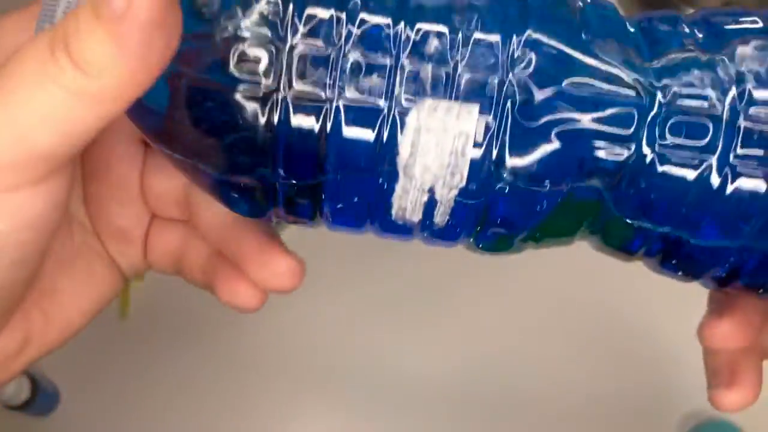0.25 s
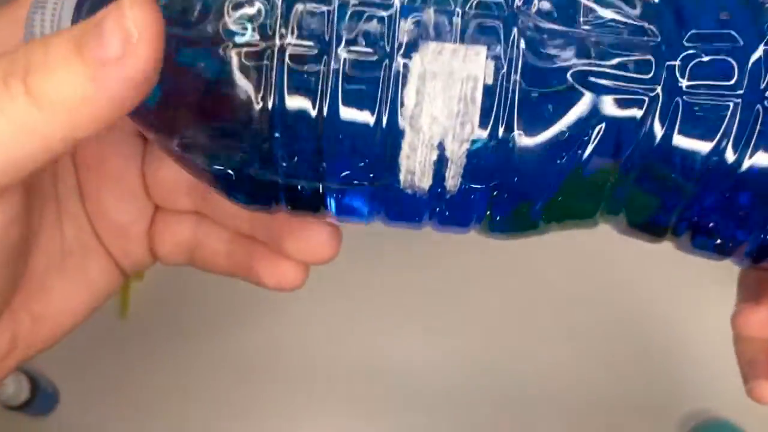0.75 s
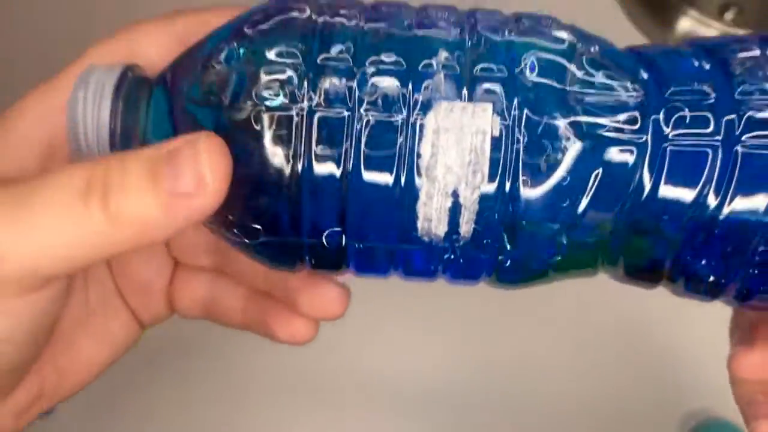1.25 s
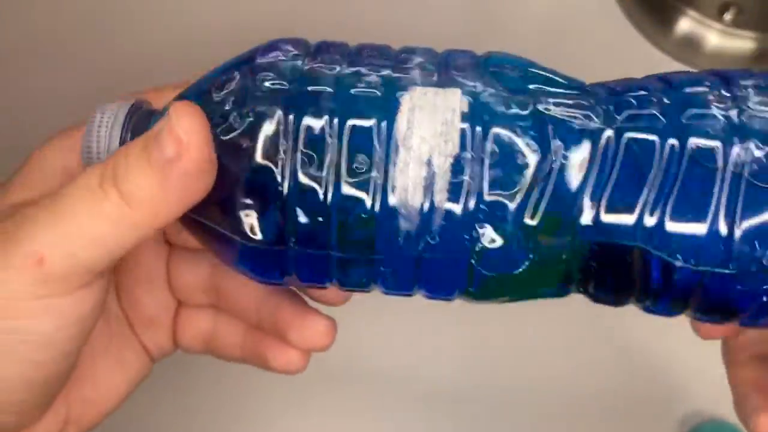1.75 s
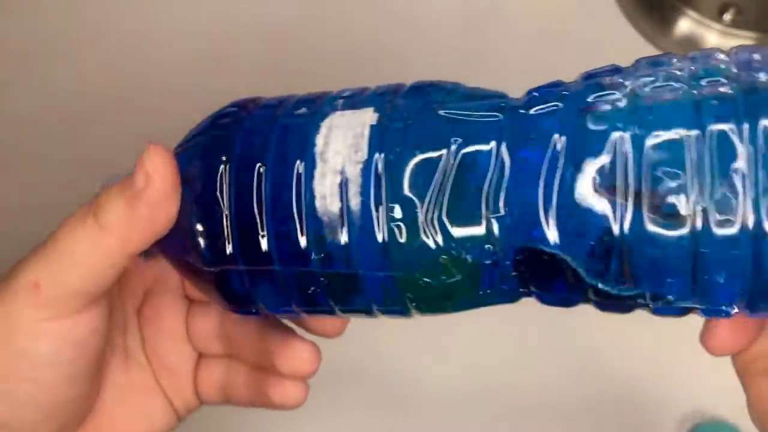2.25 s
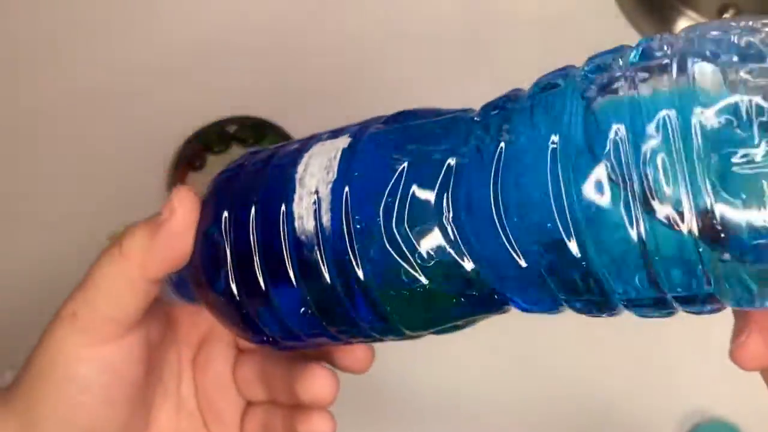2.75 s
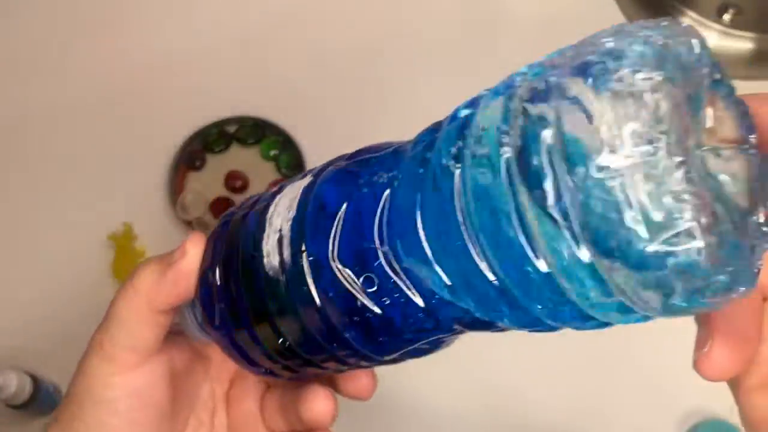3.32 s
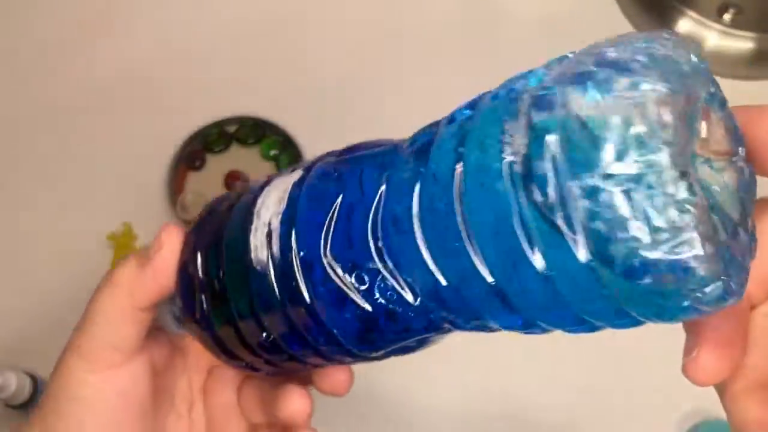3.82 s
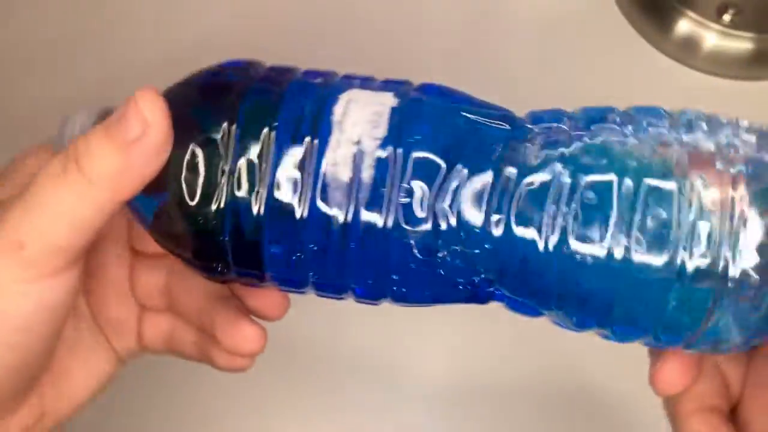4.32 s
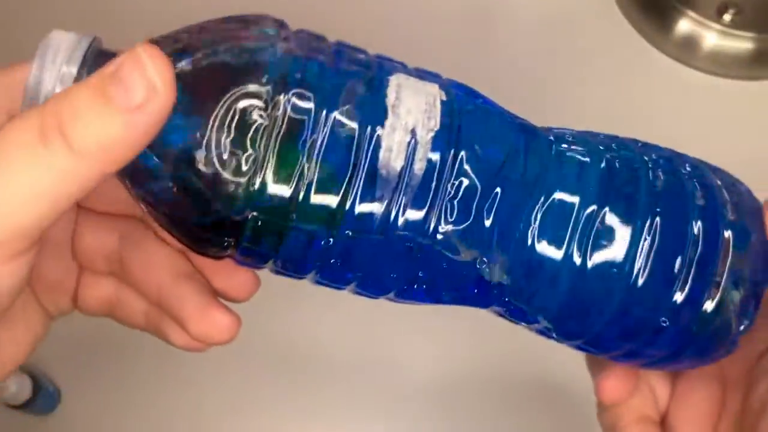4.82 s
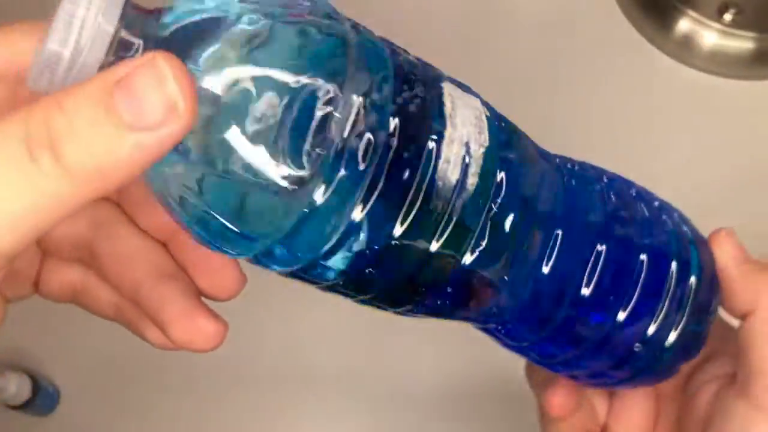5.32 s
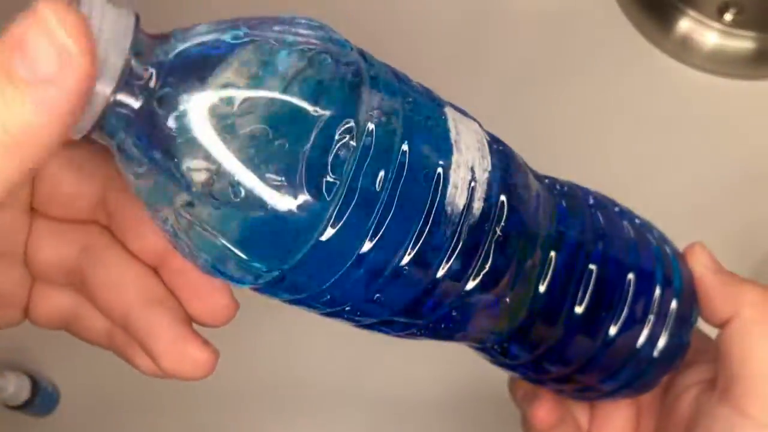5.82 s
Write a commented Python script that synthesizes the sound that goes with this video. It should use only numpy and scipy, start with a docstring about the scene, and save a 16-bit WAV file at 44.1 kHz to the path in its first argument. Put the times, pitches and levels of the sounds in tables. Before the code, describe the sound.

A thin plastic bottle of liquid and pebbles is tipped close to the microphone in a small, fairly dry room, with a steady low electric hum and soft air beneath. From 0 to 0.4 s the stones settle with soft thuds and light knocks, then almost nothing until 1.1 s. A slow, muffled slide with scattered clicks runs from 1.2 to 2.05 s, with a faint skin-on-plastic hiss near 1.7 and a sharp knock at 1.95. After a lull, stones run from 2.6 s, growing brighter and denser into a crisp rattling pile-up around 3.0-3.4, ending by 3.5. Hum remains until 4.25. Then jerky clacks and wet, hollow rumbling build from 4.3, becoming a continuous scraping cascade after 4.9, loudest and most clattery at 5.4-5.75, with bubbly blips. It drops away quickly after 5.85, leaving hum.

```python
"""Pebbles tumbling in a bottle

A thin plastic bottle of water, oil and pebbles is tipped back and forth by hand, close to the microphone.
Pebbles slide and tumble along the ribbed wall: random touches ring the wall, the ribs and the stones.
Single strikes are short noise bursts in four bands; short pitched rings and small bubbles are dying tones.
An appliance hums steadily in the small room, over a low rush of air."""
import sys
import numpy as np
from scipy import signal
from scipy.fft import rfft, irfft, next_fast_len
from scipy.io import wavfile
from scipy.ndimage import uniform_filter1d

SR = 44100
rng = np.random.default_rng(int(sys.argv[2]) if len(sys.argv) > 2 else 0)


def generate_wav(sig):
    """Save sig (samples, or channels by samples) to the path in sys.argv[1] as 16-bit PCM at SR."""
    pcm = np.round(np.clip(np.atleast_2d(sig).T, -1, 1) * 32767).astype(np.int16)
    wavfile.write(sys.argv[1], SR, pcm)


N = 267466
TIME = np.arange(N) / SR  # seconds

# single pebble strikes: start_s, level_db (before the part levels), hardness_db (higher: more tick, less knock),
# thud_db (extra level of the thud)
PEBBLE_STRIKES = [(0.006, -52, -16.5, 12.5), (0.037, -65, -12, 22.5), (0.0787, -60.5, -22, 4),
                  (0.1507, -64, -13, 0), (0.193, -44, -0.5, -3), (0.2152, -51.5, -7, -11),
                  (0.238, -49.5, -16, 1), (1.2897, -54.5, -10, 8), (1.3976, -44, -7, -14),
                  (1.4461, -47, -12, 1), (1.5213, -41.5, -3.5, -2.5), (1.569, -45.5, -3.5, -18),
                  (1.613, -40, -5.5, -2), (1.6591, -46.5, -12, 7), (1.797, -44.5, -7, -9),
                  (1.9014, -42, -3, -21), (1.9436, -49, 7, -17), (1.9524, -31, -8, -12),
                  (1.973, -38, -6, -3), (2.0271, -48.5, -8, -1), (2.665, -45.5, -11, 5),
                  (2.7488, -48, 3, -9.5), (2.8088, -44.5, -7, -2), (2.8477, -42, -3, -4),
                  (2.935, -42.5, -9.5, -9), (2.9963, -36, 7, 4.5), (3.0704, -37.5, 5, -9),
                  (3.089, -42, 2, 0.5), (3.1322, -34, 6, -19), (3.146, -40, 3, -5),
                  (3.239, -51.5, 13.5, 18), (3.2513, -48, 6, -5), (3.2663, -38.5, 17.5, -1),
                  (3.274, -37, 0, -2), (3.296, -42, 9, -20), (3.353, -41.5, 13.5, -17),
                  (3.39, -46.5, 14.5, 1), (3.449, -54.5, 7, -10), (3.483, -50.5, 1, 6),
                  (3.5057, -51.5, 7, 1), (4.2853, -47, -2.5, -8), (4.33, -49, -1, -5),
                  (4.386, -43.5, -4, -4.5), (4.4017, -46.5, 0, 7.5), (4.444, -52.5, -24, 8),
                  (4.4585, -37.5, -0.5, 3.5), (4.4792, -52.5, 20, 9), (4.516, -55, -2, -16),
                  (4.5241, -39.5, -17.5, 11.5), (4.551, -45, -8, 11), (4.5967, -33, -5.5, -8),
                  (4.653, -43.5, -10, -12), (4.734, -42.5, -13.5, 4), (4.7495, -49.5, 6, -15),
                  (4.7656, -36.5, 9.5, -7), (4.77, -35, -5, -2), (4.7979, -42.5, -7, -11),
                  (4.856, -48, -12, -14), (4.9957, -38, 2, 1), (5.0449, -35, -1.5, 0),
                  (5.0952, -40.5, -6, -7), (5.13, -38.5, 0.5, 5), (5.1818, -33, 4, 3),
                  (5.236, -39.5, 4, -3), (5.301, -40.5, -14, 1), (5.317, -40, 6, -9), (5.3729, -40, 2, -3),
                  (5.4052, -29.5, 8, 0.5), (5.4335, -37.5, 2, 6.5), (5.4874, -36, 10, 4),
                  (5.5238, -37.5, 8, -14), (5.5316, -32.5, 11.5, -22), (5.6024, -31, 3.5, -11),
                  (5.6217, -31, 2, -13.5), (5.63, -31.5, 8.5, -15), (5.6538, -35.5, 5, -8),
                  (5.6835, -34, 2.5, -20), (5.7286, -35.5, 4, -17), (5.762, -42, 5, -8),
                  (5.8236, -39, 4.5, -5)]
# frequency bands of thud, knock, crack and tick: low_hz, high_hz
PART_BANDS = [(250, 900), (900, 2400), (2400, 6000), (6000, 15000)]
# thud, knock, crack and tick of every strike: ring_t60_s, level_db (relative to the strike),
# follows (dB of gain per dB of hardness)
PART_SETTINGS = [(0.037, -3.7, 0), (0.033, -4.5, -0.83), (0.014, 1.77, 0.1152), (0.015, -1.5, 0.76)]
# modes of the water-loaded wall: pitch_hz, width_hz, level_db (relative)
WALL_MODES = [(167.4, 38, 1.5), (226.5, 31, -4), (315, 29, 0), (393.6, 31, 2.5), (491.6, 60, -1),
              (670, 56, 2.5)]
# colour of stones sliding over the ribs: pitch_hz, level_db (relative)
SLIDE_COLOUR = [(800, 2), (1020, 5.5), (1350, 2.5), (1750, 0.5), (2150, -1.5), (2700, 1), (3500, 2),
                (4500, 1)]
# colour of stones rattling on each other: pitch_hz, level_db (relative)
RATTLE_COLOUR = [(4500, 2.5), (5500, 2.5), (7200, 4.5), (8400, 6.5), (10000, 0), (13000, -4), (15500, -19)]
# colour of the room air: pitch_hz, level_db (relative, per Hz)
AIR_COLOUR = [(18, -55), (26, -26), (35, -10), (48, -1.5), (70, -3), (105, 0.5), (150, -8), (215, -12.5),
              (320, -12.5), (430, -19.5), (650, -23.5), (1100, -29.5), (2000, -33.5), (6000, -34.5),
              (16000, -39.5)]
# the loudest short pitched rings, from the bottle wall or air bubbles:
# start_s, pitch_hz, peak_db (before the soft start and decay)
SHORT_RINGS = [(.006, 410, -42), (.238, 698, -36), (1.702, 1400, -37), (1.708, 496, -32), (1.993, 159, -34),
               (3.026, 3130, -34), (3.15, 454, -29), (3.15, 178, -27.5), (3.258, 686, -26),
               (3.481, 463, -36), (3.93, 583, -51.5), (4.677, 1650, -31), (4.764, 1815, -26.5),
               (5.179, 1310, -23.5), (5.372, 465, -23.5), (5.588, 335, -25), (5.612, 658, -27.5),
               (5.735, 298, -27.5), (5.762, 2460, -35.5)]
# where the heap lies along the bottle decides which modes it drives most: time_s, rumble_hz, slide_hz
HEAP_FOCUS = [(0, 410, 2520), (1.7, 442, 2160), (2.7, 397, 2660), (3.05, 466, 2900), (3.17, 527, 1170),
              (3.5, 477, 1190), (4.45, 300, 1590), (4.95, 464, 1710), (5.22, 490, 1410), (5.45, 350, 2420),
              (5.7, 305, 2970)]
# the heap settles, slides slowly at the first tip, collapses a little, runs into the neck as the base is lifted,
# loosens in jerks when levelled, then runs down to the base as the neck is lifted:
# load_db (how heavily the heap bears on the wall), curve of (time_s, flow_db) for how fast it slides
BOTTLE_TILTS = [ (0, [(0, -46.5), (0.06, -57.5), (0.16, -57.5), (0.235, -56.5), (0.265, -46), (0.305, -69),
                (0.345, -53), (0.45, -73)]), (-1.5, [(1.12, -74), (1.22, -57.5), (1.31, -63.5),
                (1.4, -48.5), (1.56, -52.5), (1.7, -45), (1.81, -49.5), (1.86, -69)]), (1.5, [(1.93, -50.5),
                (1.98, -50), (2.06, -66), (2.2, -76.5)]), (3.5, [(2.46, -75.5), (2.61, -61.5),
                (2.68, -46.5), (2.9, -44), (3.16, -42), (3.37, -47.5), (3.43, -63.5), (3.48, -51),
                (3.55, -82)]), (0.1, [(4.24, -74), (4.3, -52), (4.43, -58.5), (4.47, -42.5), (4.56, -49),
                (4.635, -52), (4.68, -43), (4.79, -45.5), (4.84, -55)]), (1.14, [(4.89, -44), (5.12, -40.5),
                (5.3, -40), (5.42, -42.5), (5.65, -40), (5.82, -45), (5.9, -62), (6.06, -71.5)]), ]
# the heap piles up at an end of the bottle: middle_s, half_length_s, extra_rattle_db, extra_rumble_db
HEAP_LANDINGS = [(3.27, 0.15, 11.5, 2.5), (5.52, 0.33, 7.5, 3)]

AIR_DB, HUM_HZ, HUM_DB = -56, 120.4, -53.5
ROOM_T60_S, ROOM_DB = 0.29, -19.5
CUTOFF_HZ = 15800
# basic levels at full flow; below it, rumble and rattle fall by so many dB per dB of flow
FULL_FLOW_DB, FULL_RUMBLE_DB, FULL_RATTLE_DB = -39, -41.5, -51.5
RUMBLE_FOLLOWS, RATTLE_FOLLOWS = 0.96, 0.99
# the water keeps the wall stirring after the stones have stopped
WAKE_DB, WAKE_FADE_DB_PER_S = -8, 64
# lower rings last longer: t60 at 1 kHz, and its power law in pitch
RING_T60_S, RING_T60_POWER = 0.053, -0.33
# small bubbles: their peak relative to the flow, its scatter either way, and their range of pitch
BUBBLE_OVER_FLOW_DB, BUBBLE_SPREAD_DB = 4, 0.5
BUBBLE_LOW_HZ, BUBBLE_HIGH_HZ = 270, 1390
# a strike jostles its neighbours, which rattle on; the last value is dB of rattle per dB of hardness
JOSTLE_DB, JOSTLE_T60_S, JOSTLE_FOLLOWS = -5.5, 0.1, 0.51
# lesser hard clicks as stones drop onto the pile
PILE_CLICK_DB, PILE_SPREAD_DB, PILE_HARDNESS_DB, PILE_THUD_DB = -42.5, 1, 3.5, 0.5


def from_db(db):
    """Turn decibels into a gain."""
    return 10 ** (np.asarray(db) / 20)


def rms_one(x):
    """Scale a sound to an average (rms) level of 1."""
    return x / np.sqrt(np.mean(x ** 2) + 1e-20)


def at_hz(points, hz):
    """Read a colour table at any pitch, on a log-frequency axis."""
    pitch_hz, level_db = np.transpose(points)
    return np.interp(np.log(np.maximum(hz, 1)), np.log(pitch_hz), level_db)


def in_time(rows):
    """Turn each column of a curve table into one value per sample."""
    time_s, *columns = np.transpose(rows)
    return [np.interp(TIME, time_s, column) for column in columns]


def band(x, low_hz, high_hz):
    """Keep only the sound between two frequencies."""
    return signal.sosfilt(signal.butter(3, [low_hz, high_hz], "band", fs=SR, output="sos"), x)


def resonance(x, hz, width_hz):
    """Ring at one pitch, with gain 1 at the top; a narrow width rings longer."""
    r = np.exp(-np.pi * width_hz / SR)
    zeros = np.array([1, 0, -1]) * (1 - r * r) / 2
    poles = [1, -2 * r * np.cos(2 * np.pi * hz / SR), r * r]
    return signal.lfilter(zeros, poles, x + 1e-18)


def evened(x, span_s):
    """Hold the short-time rms near 1, keeping the grain inside the span."""
    size = max(int(span_s * SR), 64)
    power = uniform_filter1d(uniform_filter1d(x ** 2, size), size)
    floor = np.mean(x ** 2) / 1000  # keeps silence from being blown up
    return x / np.sqrt(np.maximum(power, 0) + floor)


def background():
    """A steady appliance hum (one sine) over the low rush of room air (coloured noise)."""
    size = next_fast_len(N)
    white = rfft(rng.standard_normal(size))
    hz = np.arange(len(white)) * SR / size
    air = irfft(white * from_db(at_hz(AIR_COLOUR, hz)), size)[:N]
    hum = np.sqrt(2) * np.sin(2 * np.pi * HUM_HZ * TIME)
    return from_db(AIR_DB) * rms_one(air) + from_db(HUM_DB) * hum


def contacts(per_s, spread_db):
    """Random touches, most of them light and a few heavy."""
    sizes = from_db(spread_db * np.minimum(rng.exponential(1, N), 4))
    happens = rng.random(N) < per_s / SR
    return sizes * rng.choice([-1, 1], N) * happens


def favoured(hz, centre_hz, lift, octaves):
    """Gain over time of a mode: it grows as the driven region comes near its pitch."""
    return 1 + lift / (1 + (np.log2(hz / centre_hz) / octaves) ** 2)


def stone_rings(touches, colour, cycles, uneven_db, count, drive=lambda hz: 1):
    """Each touch favours a few modes of the bank, so every grain has a pitch of its own."""
    at, out = np.flatnonzero(touches), np.zeros(N)
    for hz in np.geomspace(colour[0][0], colour[-1][0], count):
        draw = rng.standard_normal((len(at), 2))
        uneven = from_db(uneven_db * np.clip(draw[:, 1], -2, 2))
        force = np.zeros(N)
        force[at] = touches[at] * np.sign(draw[:, 0]) * uneven
        ring = rms_one(resonance(force, hz, hz / cycles))
        out += from_db(at_hz(colour, hz)) * drive(hz) * ring
    return out


def jostled():
    """The rattle that the strikes set off, as a gain over time; each strike adds power that dies away."""
    start_s, level_db, hardness_db, _ = np.transpose(PEBBLE_STRIKES)
    kicks = np.zeros(N)
    kicks[(start_s * SR).astype(int)] = from_db(level_db + JOSTLE_DB + JOSTLE_FOLLOWS * hardness_db) ** 2
    keep = from_db(-60 / (JOSTLE_T60_S * SR)) ** 2
    return np.sqrt(signal.lfilter([1], [1, -keep], kicks + 1e-18))


def heap_motion():
    """Levels (dB) of rumble, sliding and rattle: all follow the flow; landings boom and rattle more."""
    curves = [(s, flow_db, load_db) for load_db, curve in BOTTLE_TILTS for s, flow_db in curve]
    flow_db, load_db = in_time(curves)
    below_full_db = flow_db - FULL_FLOW_DB
    rumble_db = FULL_RUMBLE_DB + load_db + RUMBLE_FOLLOWS * below_full_db
    rattle_db = FULL_RATTLE_DB + RATTLE_FOLLOWS * below_full_db
    # the wake falls steadily from the strongest rumble so far
    fade_db = WAKE_FADE_DB_PER_S * TIME
    wake_db = np.maximum.accumulate(rumble_db + fade_db) - fade_db + WAKE_DB
    for middle_s, half_s, more_rattle_db, more_rumble_db in HEAP_LANDINGS:
        landing = np.exp(-((TIME - middle_s) / half_s) ** 4)
        rattle_db = rattle_db + more_rattle_db * landing
        rumble_db = rumble_db + more_rumble_db * landing
    rattle_db = 20 * np.log10(np.hypot(from_db(rattle_db), jostled()))
    return np.maximum(rumble_db, wake_db), flow_db, rattle_db


def tumbling_pebbles():
    """One stream of contacts booms in the wall, scratches on the ribs and ticks from stone to stone."""
    rumble_db, slide_db, rattle_db = heap_motion()
    rumble_hz, slide_hz = in_time(HEAP_FOCUS)
    # the faster the heap slides, the more contacts
    touches = contacts(per_s=240 * from_db(.25 * (slide_db + 44.5)), spread_db=3.5)
    # each contact is followed by fine grit grinding under it for a few milliseconds
    press = signal.lfilter([1], [1, -np.exp(-1 / (0.0034 * SR))], touches ** 2)
    grit = contacts(per_s=3500, spread_db=2.5) * np.sqrt(press + 0.11 * np.mean(press))
    force = touches + from_db(-18.5) * grit
    # where a stone lands decides how hard it drives each wall mode
    wall = np.zeros(N)
    for hz, width_hz, level_db in WALL_MODES:
        drive = favoured(hz, rumble_hz, lift=0.76, octaves=0.14)
        ring = resonance(force * rng.standard_normal(N), hz, width_hz)
        wall += from_db(level_db) * drive * ring
    rumble = from_db(rumble_db) * evened(band(wall, 125, 1050), span_s=0.036)
    # stones bumping over the ribs ring the higher modes of the shell
    ribs = stone_rings(force, SLIDE_COLOUR, cycles=24.7, uneven_db=9, count=30,
                       drive=lambda hz: favoured(hz, slide_hz, lift=0.93, octaves=0.27))
    slide = from_db(slide_db + 0.67) * evened(ribs, span_s=0.1)
    clicks = evened(stone_rings(force, RATTLE_COLOUR, cycles=38, uneven_db=5.5, count=24), span_s=0.096)
    # slow contacts are softer and lose their top
    soft = evened(signal.sosfilt(signal.butter(2, 5500, fs=SR, output="sos"), clicks), span_s=0.035)
    hard = np.clip((rattle_db + 66) / 17, .1, 1)
    rattle = from_db(rattle_db) * evened(hard * clicks + (1 - hard) * soft, span_s=0.27)
    return rumble + slide + rattle


def pile_clicks(count=17):
    """Stones drop onto the pile at random, thickest mid-landing: rows like those of PEBBLE_STRIKES."""
    rows = []
    for middle_s, half_s, _, _ in HEAP_LANDINGS:
        for a, b, strength in rng.uniform(-1, 1, (count, 3)):
            start_s = middle_s + half_s * (a + b) / 2
            level_db = PILE_CLICK_DB + PILE_SPREAD_DB * strength
            rows.append((start_s, level_db, PILE_HARDNESS_DB, PILE_THUD_DB))
    return rows


def strikes(chatter=0.19, thud_lag_s=0.00122):
    """A first contact, then chatter and ringing, lows later and longer; stone ticks, the wall knocks."""
    length, head = int(.06 * SR), int(.006 * SR)  # the level is set over the first 6 ms
    t, out = np.arange(length) / SR, np.zeros(N + length)
    for start_s, level_db, hardness_db, thud_db in list(PEBBLE_STRIKES) + pile_clicks():
        start = int(start_s * SR)
        extras_db = (thud_db, 0, 0, 0)
        for (low_hz, high_hz), (t60_s, part_db, follows), extra_db in zip(PART_BANDS, PART_SETTINGS, extras_db):
            force = chatter * rng.standard_normal(length) * from_db(-60 * t / t60_s)
            # the higher the band, the shorter its lag
            force[int(thud_lag_s * SR * PART_BANDS[0][0] / low_hz)] += 1
            ring = band(force, low_hz, high_hz)
            gain = from_db(level_db + part_db + extra_db + follows * hardness_db)
            out[start:start + length] += gain * ring / np.sqrt(np.mean(ring[:head] ** 2))
    return out[:N]


def small_bubbles(count=120):
    """Bubbles of random size, as loud as the flow that stirs them: rows like those of SHORT_RINGS."""
    flow_db = heap_motion()[1]
    when, size, strength = rng.random((count, 3)).T
    hz = BUBBLE_LOW_HZ * (BUBBLE_HIGH_HZ / BUBBLE_LOW_HZ) ** size
    scatter_db = BUBBLE_SPREAD_DB * (2 * strength - 1)
    peak_db = flow_db[(when * N).astype(int)] + BUBBLE_OVER_FLOW_DB + scatter_db
    return list(zip(when * N / SR, hz, peak_db))


def pitched_rings(rise_per_s=0.4):
    """Each short ring or small bubble is one dying tone that creeps up in pitch."""
    t, out = np.arange(SR // 4) / SR, np.zeros(N + SR)
    for start_s, hz, peak_db in list(SHORT_RINGS) + small_bubbles():
        start = int(start_s * SR)
        t60_s = RING_T60_S * (hz / 1000) ** RING_T60_POWER
        shape = from_db(peak_db - 60 * t / t60_s) * (1 - np.exp(-t * hz))
        out[start:start + len(t)] += shape * np.sin(2 * np.pi * hz * (t + rise_per_s * t * t / 2))
    return out[:N]


def finger_slip(at_s=1.72, width_s=0.078, level_db=-59):
    """Skin slides on the plastic with a short, smooth hiss."""
    hiss = rms_one(band(rng.standard_normal(N), 7000, 14000))
    return from_db(level_db) * np.exp(-((TIME - at_s) / width_s) ** 2) * hiss


def room(x, dull_hz=7000):
    """A diffuse tail from the table top and near walls: fading noise, dulled in the treble."""
    t = np.arange(SR // 2) / SR
    tail = rng.standard_normal(len(t)) * from_db(-60 * t / ROOM_T60_S) * (t > .004)
    tail = signal.lfilter([1], [1, -np.exp(-2 * np.pi * dull_hz / SR)], tail)
    return signal.fftconvolve(x, tail / np.sqrt(np.sum(tail ** 2)))[:N]


def scene():
    """The bottle in its room, with a faint echo tail and the background."""
    bottle = tumbling_pebbles() + strikes() + pitched_rings() + finger_slip()
    return (bottle + from_db(ROOM_DB) * room(bottle) + background())[None]


def record(dry):
    """Cut the highest treble steeply."""
    return signal.sosfilt(signal.ellip(10, .1, 80, CUTOFF_HZ, fs=SR, output="sos"), dry)


dry = scene()
out = record(dry)
generate_wav(out)
```